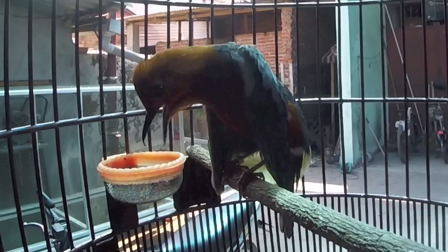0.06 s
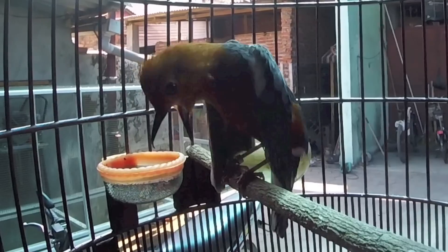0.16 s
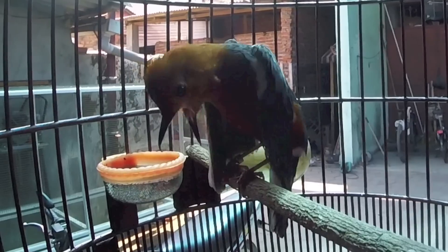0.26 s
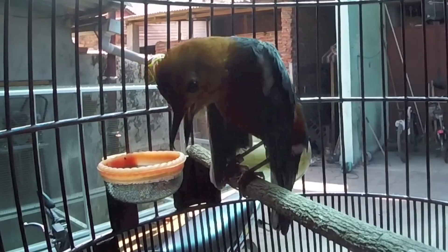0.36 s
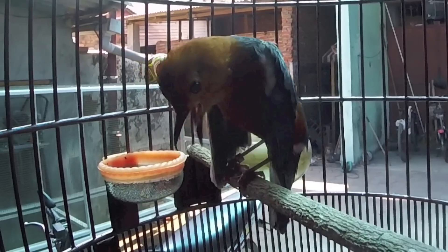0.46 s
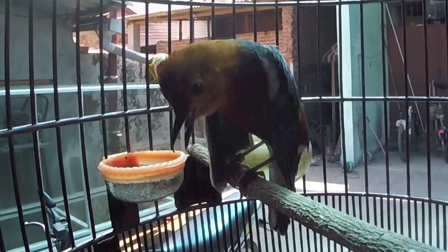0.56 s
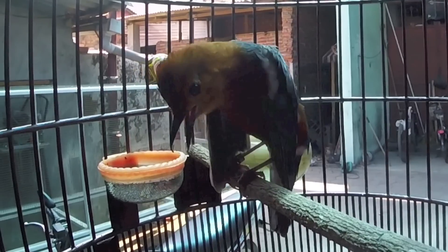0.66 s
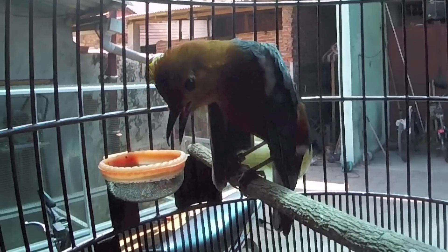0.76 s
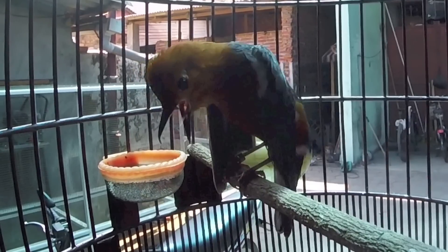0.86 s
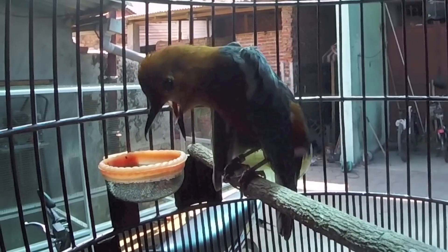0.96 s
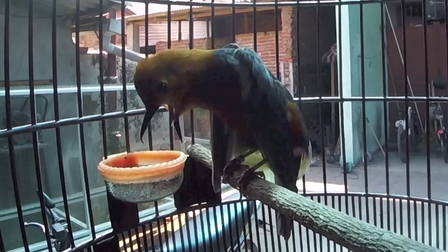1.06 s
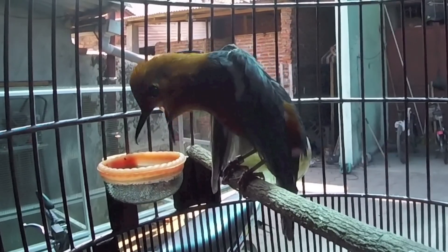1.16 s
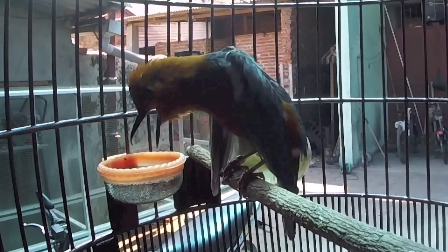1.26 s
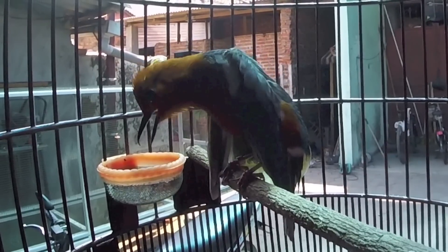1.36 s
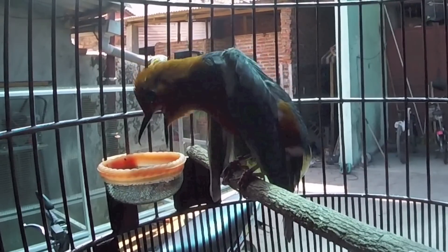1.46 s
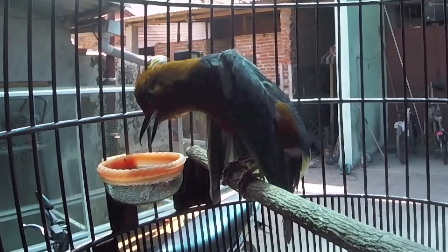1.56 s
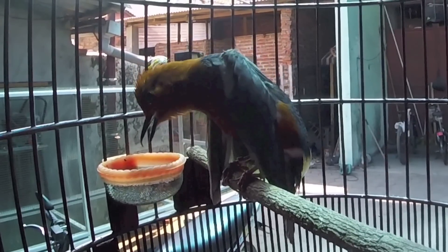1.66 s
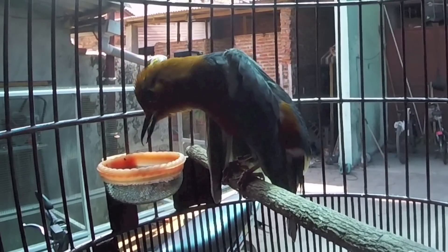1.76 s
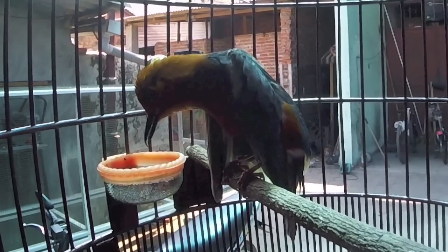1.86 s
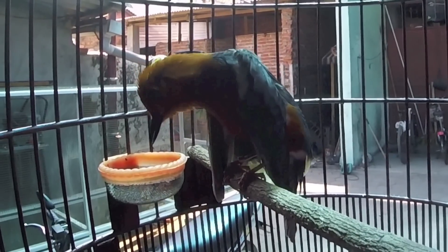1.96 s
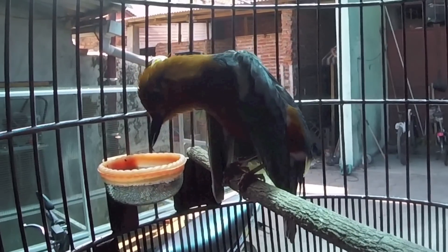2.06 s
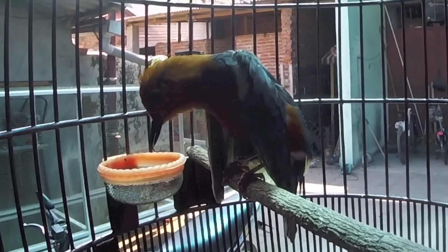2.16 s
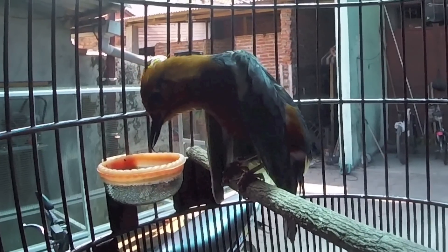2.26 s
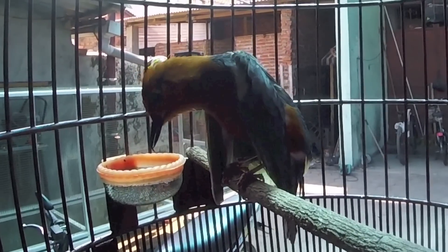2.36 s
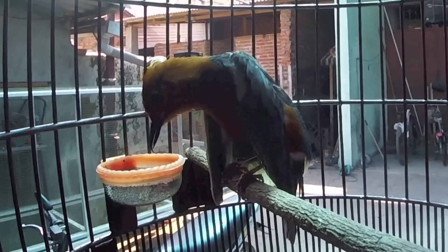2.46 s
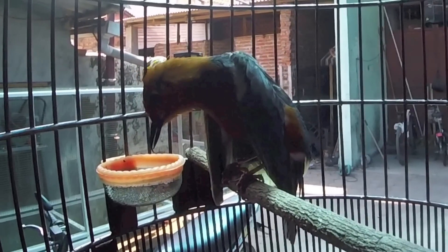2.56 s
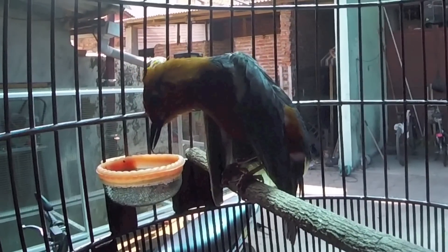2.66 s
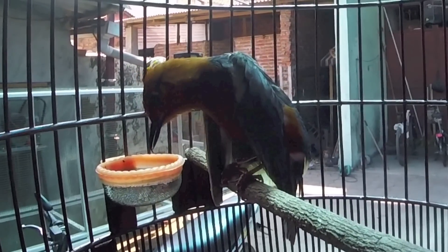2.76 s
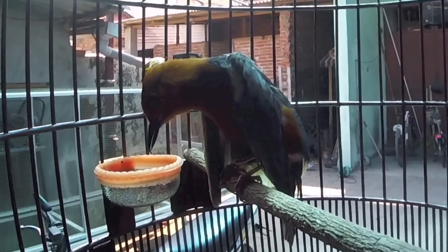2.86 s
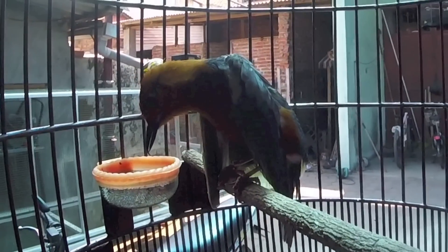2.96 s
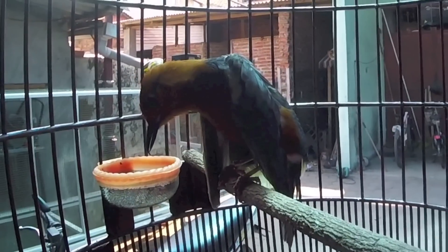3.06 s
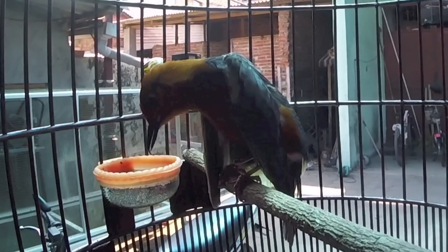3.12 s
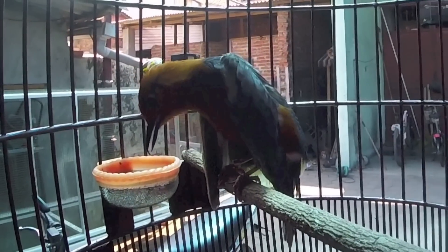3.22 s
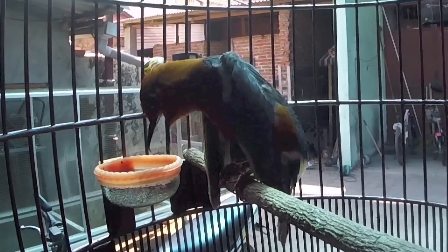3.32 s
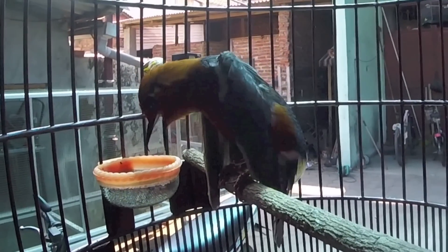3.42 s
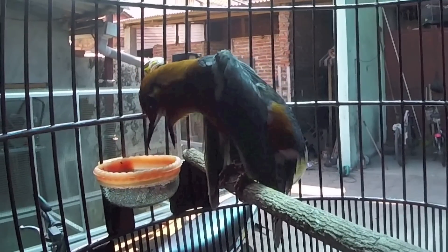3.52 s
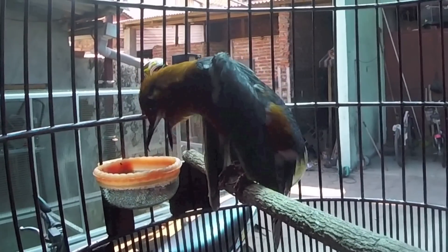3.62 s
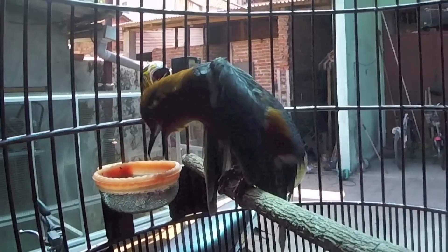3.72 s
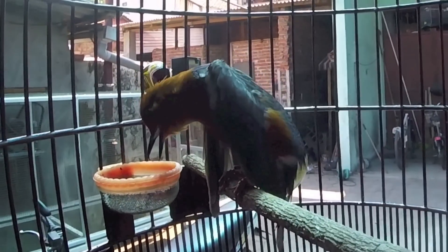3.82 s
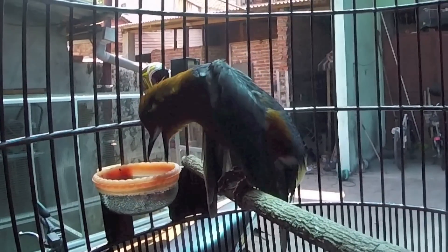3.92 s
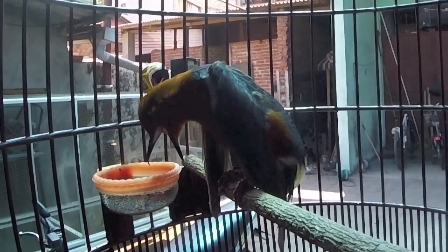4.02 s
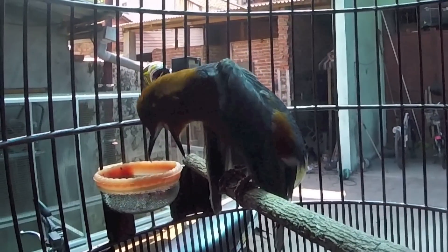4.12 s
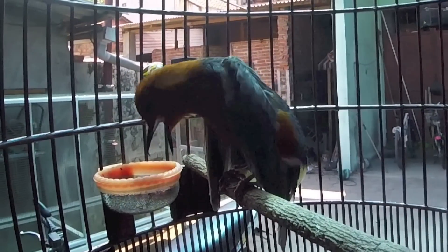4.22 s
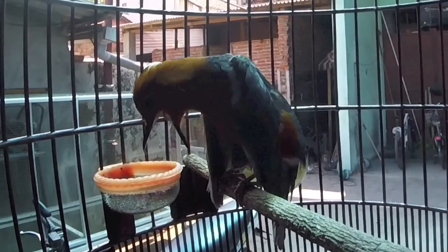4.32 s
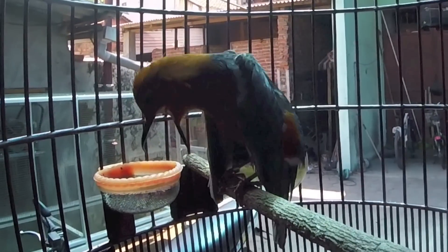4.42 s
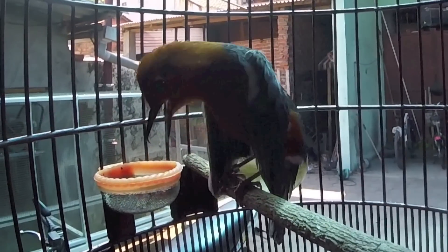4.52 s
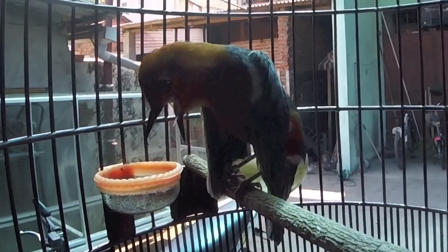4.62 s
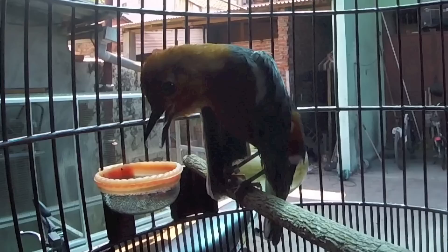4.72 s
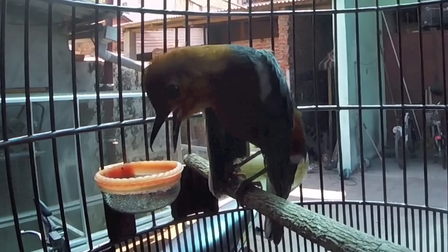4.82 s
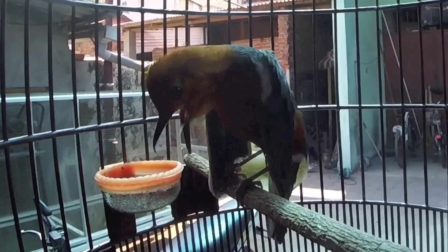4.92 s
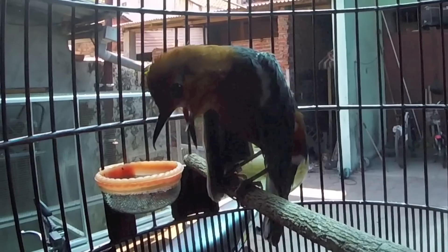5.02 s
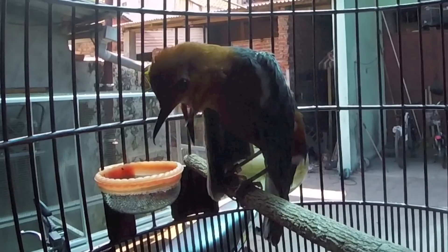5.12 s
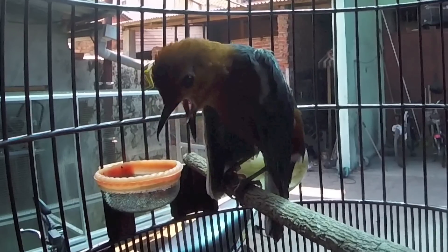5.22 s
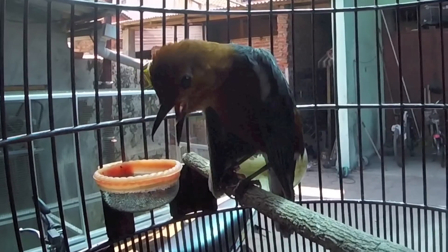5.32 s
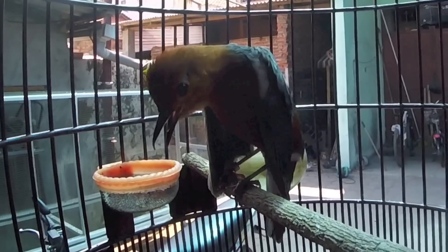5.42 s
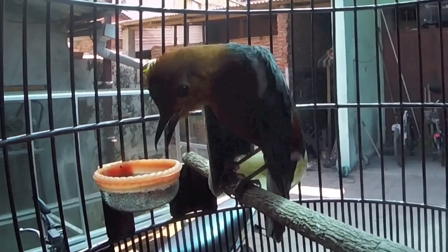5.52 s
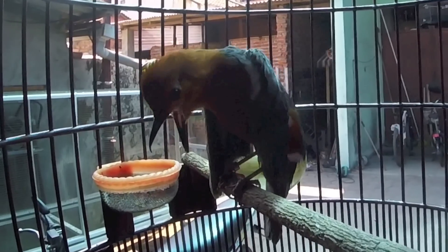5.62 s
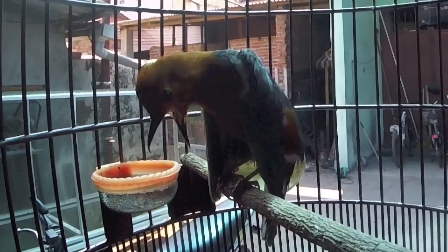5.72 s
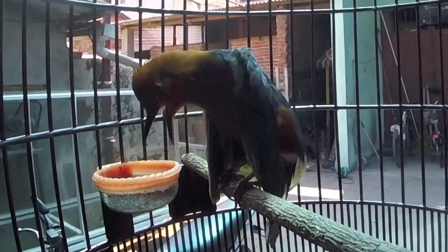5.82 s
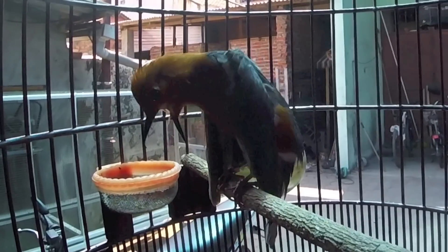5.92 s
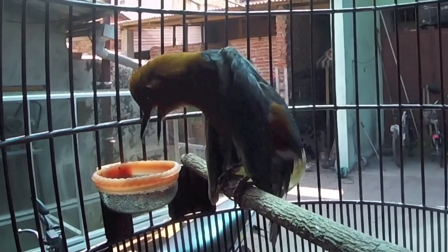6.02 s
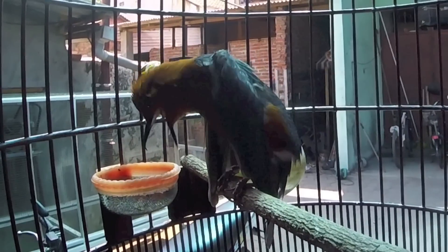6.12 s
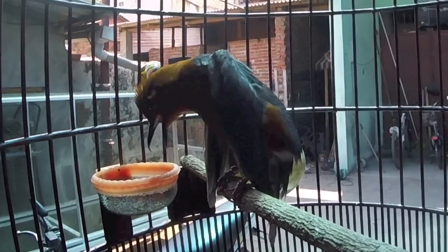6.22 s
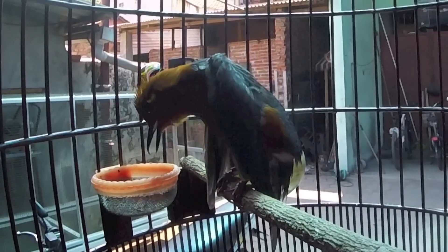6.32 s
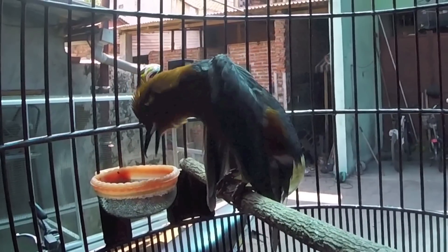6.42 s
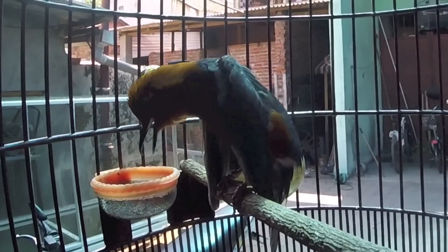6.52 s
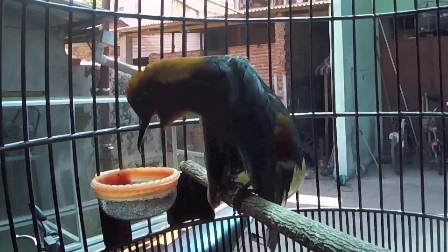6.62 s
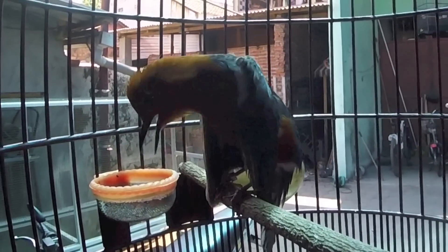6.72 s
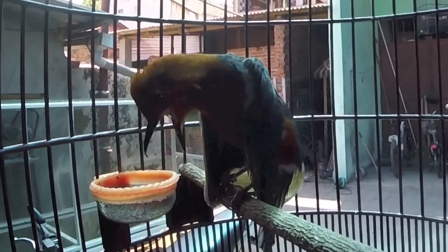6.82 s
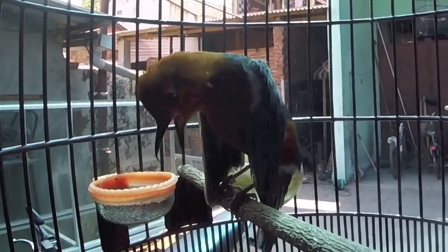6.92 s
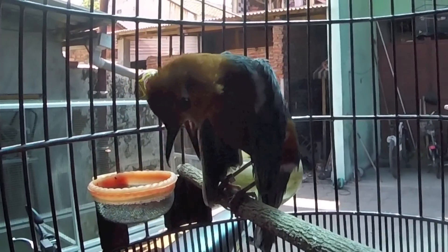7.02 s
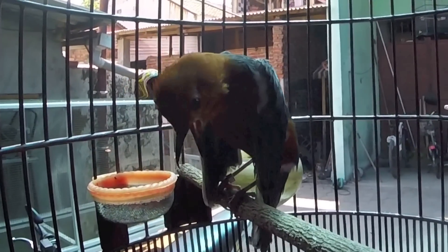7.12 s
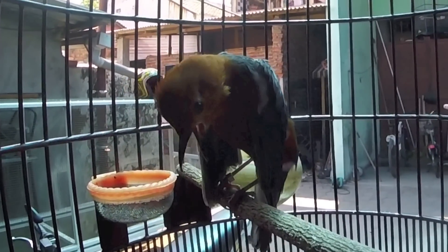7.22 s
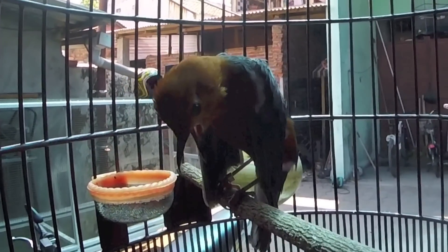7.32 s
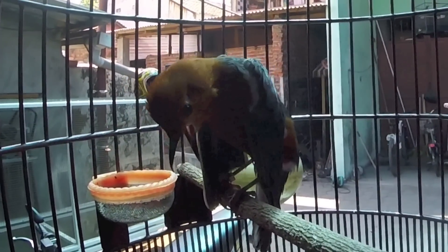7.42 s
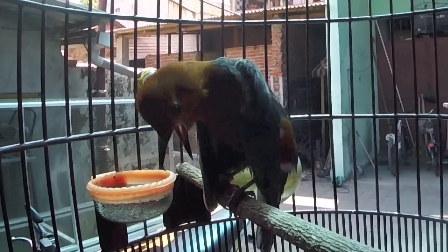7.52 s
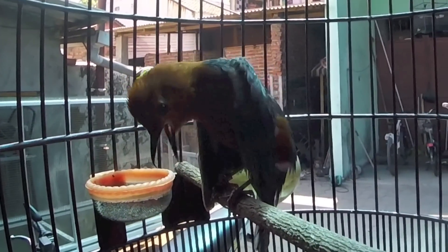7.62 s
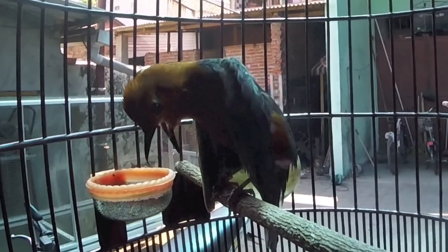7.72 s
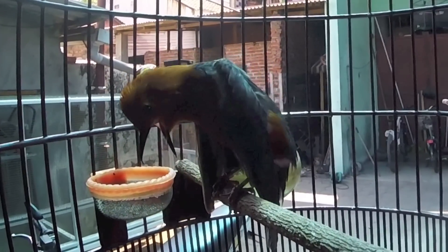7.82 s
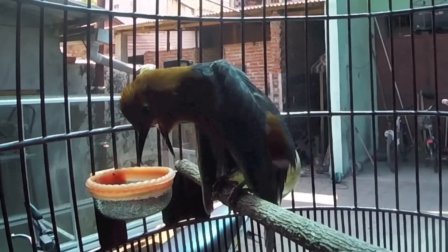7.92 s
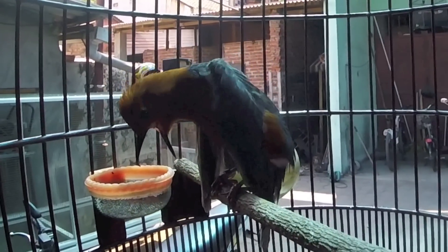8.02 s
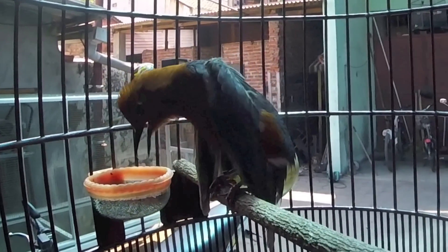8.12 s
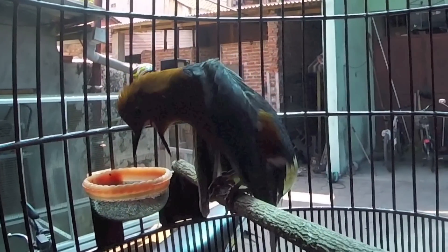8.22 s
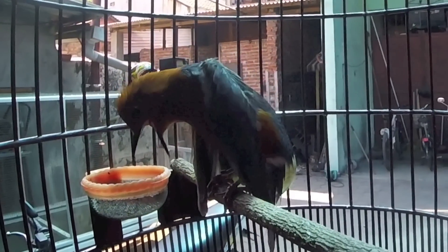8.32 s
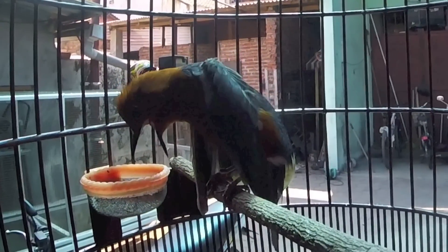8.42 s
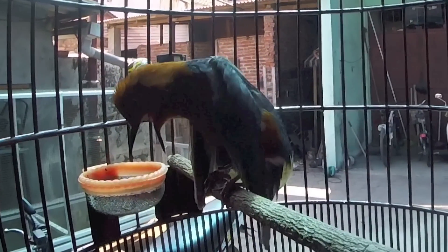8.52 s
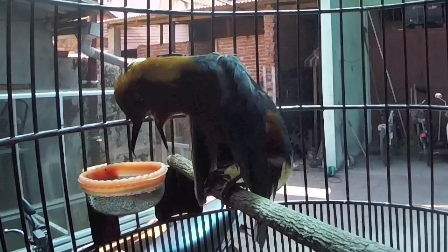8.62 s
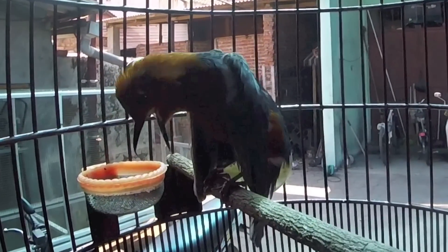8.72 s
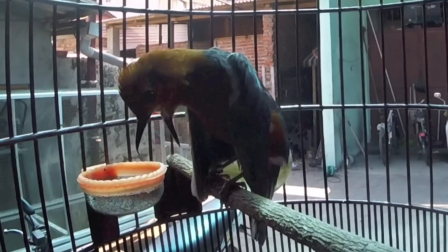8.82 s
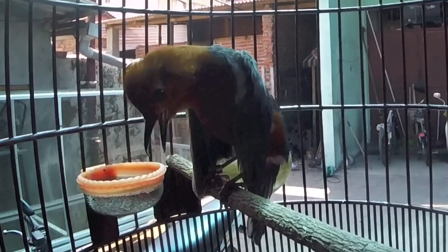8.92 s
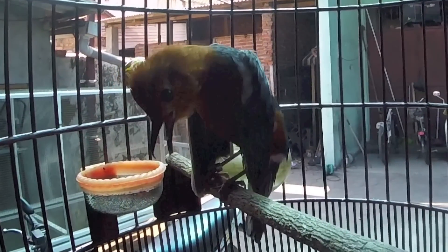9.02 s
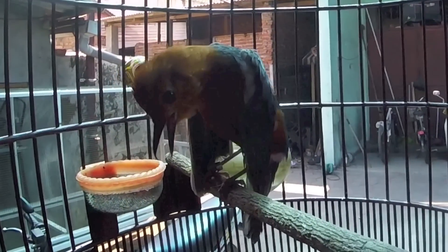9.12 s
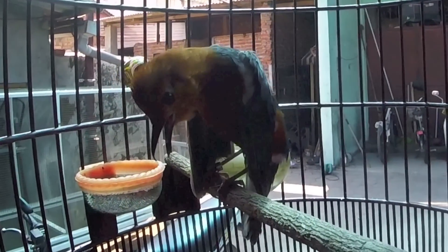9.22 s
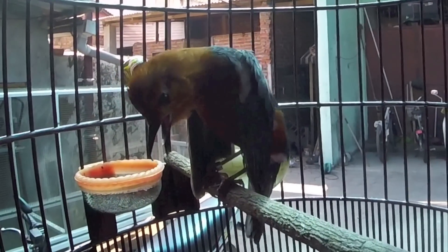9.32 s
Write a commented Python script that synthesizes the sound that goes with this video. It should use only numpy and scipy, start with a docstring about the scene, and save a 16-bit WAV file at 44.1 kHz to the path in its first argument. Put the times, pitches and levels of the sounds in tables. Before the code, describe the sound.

A caged songbird sings loud and close, with a short echo from yard walls. From 0.2 to 1.4 seconds it gives a stepped falling whistle, a longer rising one, tiny dropping notes and a downward slide. It pauses until about 3 seconds, leaving faint distant birds and a soft hiss near 1.8. From 3 to 5.2 seconds come quick varied whistles, high swoops and another rising whistle. Four hoarse arched notes follow from 5.3 to 5.9, then four whip-like falls and a thin high note by 6.6. A loud rapid trill runs from 6.7 to 7.7, with one brief break. Seven quick chips follow from 8 to 8.5, then harsh buzzy notes from 8.8 to 9.3. Other birds call further off in the gaps. Faint traffic rumble and yard noise continue throughout, with passing motors humming a little louder from about 7 seconds.

```python
"""First comes a loud, close whistle: a caged thrush singing in a walled yard. Its voice organ, the
syrinx, makes nearly pure gliding tones; its two sides can sound together and beat. Whistles and
doubled notes lead on to whips, trills, chips and buzzes, all echoing off the walls. Other birds call
from further off, over traffic rumble, passing motors and yard noise; a hiss swells in one pause.
A limiter holds down the loudest notes, which clip a little."""
import sys
import numpy as np
from scipy import signal
from scipy.io import wavfile
from scipy.ndimage import uniform_filter1d, minimum_filter1d

SR = 44100
rng = np.random.default_rng(int(sys.argv[2]) if len(sys.argv) > 2 else 0)


def unload_audio(sound):
    """Save the sound as a 16-bit wav file, at the path given as the first command line argument."""
    columns = np.transpose(np.atleast_2d(sound))
    # keep every value between -1 and 1, then stretch to whole-number steps
    steps = np.round(np.clip(columns, -1, 1) * 32767)
    wavfile.write(sys.argv[1], SR, steps.astype(np.int16))


N = 413216
LEAD = 4000  # samples before time zero, so that early notes already echo

# Levels in the tables are relative: the functions add their own gains.
# tone colour of traffic rumble, yard noise and hiss: f/Hz, level/dB
RUMBLE_COLOUR = [(20, -3.5), (70, 2), (177, -7), (203, -21.5), (520, -60)]
YARD_COLOUR = [(120, -29.5), (200, -3.5), (2170, -15.5), (3760, -6.5), (4820, -19), (5560, -15.5),
               (6520, -28), (7250, -14), (9140, -34.5), (14000, -34.5)]
HISS_COLOUR = [(500, -8.5), (1300, -0.5), (2800, -2.5), (4500, -8.5), (8000, -32)]
# how those three swell and fade: t/s, level/dB
RUMBLE_LEVEL = [(0, -54), (2.601, -43), (5, -54.5), (6.199, -44), (9.37, -40.5)]
YARD_LEVEL = [(0, -54), (1, -62), (1.6, -54.5), (3.2, -53), (3.3, -56.5), (5.701, -57), (5.87, -40),
              (6.202, -50)]
HISS_LEVEL = [(1.3, -61), (1.784, -42), (1.81, -36), (2.05, -46), (2.302, -63)]
# hum of passing motors, one list each: t/s, f/Hz, level/dB
MOTORS = [
    [(2.8, 179.2, -56), (3.2, 179.5, -44.5), (3.6, 183, -76)],
    [(6.4, 87.6, -67), (7.4, 62.9, -35.5), (8.5, 67, -39)],
    [(8.4, 62.35, -44), (8.888, 88.8, -46), (9.37, 85.7, -33)],
]
# low hoarse calls far away: t/s, length/s, f/Hz, level/dB
HOARSE_CALLS = [(0.157, 0.04, 691, -56.5), (1.299, 0.068, 831, -47.5), (1.494, 0.067, 1020, -56),
                (5.84, 0.035, 374, -49)]
# glides of other birds: t/s, length/s, first f/Hz, last f/Hz, level/dB, level change/dB
OTHER_BIRDS = [(1.988, 0.15, 6290, 5560, -63.5, 4), (2.137, 0.057, 5730, 4300, -46, -11.5),
               (2.305, 0.17, 4260, 2400, -45.5, -22), (2.519, 0.56, 8520, 7770, -73, 9.5),
               (2.484, 0.044, 5630, 5270, -55, -1.5), (2.594, 0.038, 3536, 3090, -54.5, -3),
               (2.711, 0.027, 5350, 4020, -41.5, -6), (2.759, 0.17, 6280, 5720, -55, -3),
               (2.785, 0.14, 4550, 4980, -46.5, -16), (6.587, 0.073, 3290, 4506, -45, 20),
               (6.653, 0.1, 2403, 3450, -50.5, 21), (7.384, 0.08, 4440, 2913, -27, -9),
               (7.827, 0.052, 4490, 3146, -23, -9.5), (8.114, 0.058, 3035, 2240, -33.5, -9.5),
               (8.401, 0.084, 3020, 1963, -34.5, -19.5), (8.668, 0.073, 3270, 2003, -33.5, -12.5),
               (9.014, 0.101, 4340, 4650, -50, 0)]
# time for the wall echoes to fade by 60 dB, before stretching: f/Hz, length/s
WALL_DECAY = [(1000, 0.78), (5000, 0.6), (13000, 0.047)]
# tone colour of the wall echoes: f/Hz, level/dB
ECHO_COLOUR = [(1500, 0.5), (4000, -6.5), (6000, -10.5), (7300, -2), (13000, -5)]
# first echoes from the roof and wall close by: delay/s, level/dB
NEAR_ECHOES = [(.0021, -17), (.0047, -20)]

# side tones of the voice, at whole and at half steps of its pitch: multiple, level/dB
WHOLE_TONES = [(2, -25), (3, -43.5), (4, -29.5)]
BETWEEN_TONES = [(.5, -4), (1.5, -3), (2.5, -20)]
# how throat and beak colour the side tones, usually and in trills: f/Hz, level/dB
BEAK_COLOUR = [(2000, -17), (4500, 2.5), (5800, -12), (7300, -6.5), (10500, -4.5), (14000, -5.5)]
TRILL_COLOUR = [(6000, -8), (7300, 10.5), (9500, -20), (10500, -21.5), (12200, -11.5), (14000, -38)]
# loudness of the voice by pitch, usually and in trills: f/Hz, level/dB
VOICE_LOUDNESS = [(2000, -17), (2800, -9), (3700, -0.5), (4450, -7.5), (5200, -2), (6200, -12),
                  (7200, -1.5), (8500, -18.5), (10000, -18.5)]
TRILL_LOUDNESS = [(3100, -13.5), (3600, -8), (4500, -2), (5000, -10.5), (5700, -20)]
# named pitch shapes of whistles, before stretching: t/s within the note, f/Hz
PITCH_SHAPES = { "step": [(0, 4240), (.008, 3910), (.035, 3956), (.084, 3990), (.103, 2980), (.118, 2760),
                (.133, 2875), (.205, 2770), (.222, 2530)], "rise": [(0, 4150), (.012, 3743), (.18, 4148),
                (.33, 4483), (.369, 4380), (.379, 3570), (.39, 2766)], "slide": [(0, 4300), (.018, 4346),
                (.055, 3770), (.125, 2870), (.177, 2460)], "lift": [(0, 2675), (.017, 2760), (.027, 3305),
                (.062, 3290), (.095, 3190)], "peep": [(0, 3550), (.012, 3756), (.064, 3653)],
                "bow": [(0, 3632), (.018, 3888), (.11, 3250), (.178, 2630)], "low": [(0, 1894),
                (.017, 2309), (.059, 2704), (.119, 2548)], "swoop": [(0, 7400), (.016, 7973), (.042, 5630),
                (.057, 5080), (.135, 5470), (.151, 5196), (.163, 3750), (.174, 3737), (.179, 4550),
                (.192, 3720)], "zigzag": [(0, 7500), (.016, 7950), (.033, 5770), (.05, 5030), (.077, 4950),
                (.081, 5400), (.089, 4360), (.098, 4740), (.103, 7700), (.112, 7350), (.118, 5980),
                (.147, 4660), (.16, 3410)], "seep": [(0, 9740), (.021, 8100), (.044, 7060), (.058, 6080)],
                "flick": [(0, 4900), (.007, 7360), (.015, 4700)], "thin": [(0, 8400), (.015, 8750),
                (.06, 7970), (.104, 7650), (.115, 6700)], "hook": [(0, 6840), (.024, 8170), (.04, 7650),
                (.088, 7270)], "pip": [(0, 5420), (.02, 5240)], }
# whistles: t/s, shape name, time stretch, effort/dB, attack/s, effort change/dB
WHISTLES = [(0.203, "step", 1.03, 0, 0.036, -6.5), (1.186, "slide", 0.96, 1.5, 0.052, -21.5),
            (3.172, "lift", 0.8, 3, 0.027, -12.5), (3.259, "peep", 0.94, 1.5, 0.058, -1),
            (3.35, "bow", 0.98, -0.5, 0.031, -13.5), (3.57, "low", 1.02, -7, 0.013, 0.5),
            (3.776, "swoop", 1, -7, 0.018, 3.5), (4.06, "zigzag", 1, -4, 0.026, -1.5),
            (4.381, "step", 0.99, 0.5, 0.037, -7), (6.557, "seep", 0.91, 4, 0.02, -10.5),
            (7.716, "thin", 0.91, 2, 0.03, -10.5), (8.556, "hook", 0.92, -5.5, 0.019, -2),
            (0.561, "rise", 1.006, -0.5, 0.092, -0.5), (4.698, "rise", 0.932, 0.5, 0.088, -1),
            (7.699, "flick", 1.15, -11, .004, 0), (3.054, "pip", 1.4, -33.5, .008, 3),
            (8.564, "pip", 0.68, -11.5, 0.0086, 10.5)]
# falling notes that close each rising whistle: t/s, top f/Hz, effort/dB
DROP_NOTES = [(0.952, 4060, -6.5), (0.982, 3745, -5.5), (1.008, 3420, -17.5), (5.063, 3890, -6),
              (5.092, 3675, -7.5), (5.122, 3506, -6.5)]
# arched notes: t/s, length/s, share of length before the crest, first f/Hz, crest f/Hz, last f/Hz,
# level/dB, boost of the in-between tones/dB, roughness
DOUBLED_NOTES = [(-0.06, 0.088, 0.8, 4250, 5216, 3360, -15, 9.5, 1.1),
                 (3.072, 0.095, 0.2, 3670, 4720, 4850, -14.5, 10, 1.5),
                 (5.333, 0.081, 0.61, 4590, 5860, 4110, -15, 0, .8),
                 (5.454, 0.092, 0.73, 4250, 5240, 3260, -14, 2, 1.1),
                 (5.623, .11, .63, 4210, 5020, 3166, -13, -1, 1.05),
                 (5.818, 0.12, 0.64, 4210, 4850, 3170, -9.5, -5.5, 0.46)]
# fast falls: t/s, length/s, top f/Hz, share of length at mid fall, steepness, effort/dB, attack/s
WHIP_NOTES = [(6.051, 0.064, 7430, .55, 1.7, -8.5, 0.016), (6.172, 0.058, 8200, .38, 2.3, -8, 0.022),
              (6.287, 0.058, 8800, .2, 3.6, -8.5, 0.014), (6.404, 0.063, 8300, .17, 3.6, -8.5, 0.013)]
# outline of each trill: t/s, top f/Hz, bottom f/Hz, level/dB
TRILL_OUTLINES = [
    [(6.712, 3170, 3150, -10), (6.738, 4660, 3300, -6), (6.75, 4690, 3664, -4), (6.82, 5110, 3080, -3.5),
     (6.94, 4650, 3060, -2), (6.97, 5790, 3275, -6.5), (6.992, 5910, 3220, -2), (7.01, 4850, 3333, -3.5),
     (7.15, 4850, 3430, -4.5), (7.195, 4270, 3460, -4.5), (7.33, 4510, 3210, -2.5), (7.376, 5330, 3110, -4)],
    [(7.499, 4960, 3536, -9.5), (7.698, 5165, 3316, -4)],
]
# pace of both trills: t/s, strokes sung so far
TRILL_PACE = [(6.74, -.44), (6.75, 0), (6.857, 6), (6.99, 13), (7.164, 21), (7.224, 23), (7.363, 29),
              (7.512, 36), (7.7, 44.75)]
# shape of one chip: t/s within the note, f/Hz, level/dB
CHIP_SHAPE = [(0, 3530, -19), (.004, 3820, -6.5), (.009, 4590, -6.5), (.014, 4856, 1), (.019, 5120, -1.5),
              (.026, 4775, -2), (.032, 3850, -48)]
# the run of chips: t/s, level/dB
CHIP_NOTES = [(7.951, -9.5), (8.026, -11), (8.106, -9), (8.189, -11.5), (8.273, -9.5), (8.357, -11),
              (8.443, -10.5)]
# harsh chopped notes: start t/s, loudest t/s, end t/s, level/dB, f/Hz
BUZZ_NOTES = [(8.755, 8.773, 8.797, -10, 3270), (8.813, 8.851, 8.882, -11.5, 3155),
              (8.906, 8.927, 8.955, -10, 3340), (8.988, 8.998, 9.04, -8, 3336),
              (9.128, 9.137, 9.172, -11, 2980), (9.16, 9.223, 9.26, -13, 2996),
              (9.28, 9.303, 9.328, -8, 3330)]


def gain_of(db):
    return 10 ** (np.asarray(db) / 20)


def unit_rms(x):
    return x / np.sqrt(np.mean(x ** 2) + 1e-20)


def look_up(table, hz):
    """The table's value at a pitch, blended between its rows."""
    f, value = np.transpose(table)
    return np.interp(np.log(hz + 1), np.log(f + 1), value)


def add(mix, start, sound):
    part = mix[round(start * SR) + LEAD:][:len(sound)]
    part += sound[:len(part)]


def curves(rows, smooth_s=.003):
    """Turn timed rows into one smooth curve for each column after the time."""
    times, *columns = np.transpose(rows)
    t = np.arange(times[0], times[-1], 1 / SR)
    size = round(smooth_s * SR) + 1
    return [uniform_filter1d(np.interp(t, times, c), size, mode="nearest") for c in columns]


def wander(n, hz):
    """A smooth random wobble of typical size 1; hz sets how fast it moves."""
    size = round(SR / hz)
    return unit_rms(uniform_filter1d(uniform_filter1d(rng.standard_normal(n), size), size))


def noise_bed(colour, levels, low_hz, high_hz, patchy_db):
    """Noise with drifting louder patches; levels sets its strength between low_hz and high_hz."""
    frames, hz = N // 512 + 5, np.fft.rfftfreq(2048, 1 / SR)
    real, imag, patches = rng.standard_normal((frames, 1025, 3)).T
    patches = unit_rms(uniform_filter1d(uniform_filter1d(patches, 16, axis=0), 8, axis=1))
    shape = gain_of(look_up(colour, hz))
    band_share = np.sqrt(np.sum(shape[(hz > low_hz) & (hz < high_hz)] ** 2) / np.sum(shape ** 2))
    spectra = (real + 1j * imag) * shape[:, None] * gain_of(patchy_db * patches)
    noise = signal.istft(spectra, nperseg=2048, noverlap=1536)[1][:N]
    return unit_rms(noise) / band_share * gain_of(np.interp(np.arange(N) / SR, *np.transpose(levels)))


def motors():
    """Each motor passing in the street hums one low, wavering tone."""
    out = np.zeros(N + LEAD)
    for rows in MOTORS:
        hz, db = curves(rows)
        tone = np.sin(2 * np.pi * np.cumsum(hz * (1 + .0094 * wander(len(hz), 21))) / SR)
        add(out, rows[0][0], np.sqrt(2) * gain_of(db) * tone * signal.windows.tukey(len(hz), .2))
    return out


def wall_echoes(sound, stretch):
    """Many small echoes bounce round the yard; the high pitches die first."""
    echoes = np.zeros(SR)
    slots = np.arange(130, SR - 20, 20)
    echoes[slots + rng.integers(0, 20, len(slots))] = rng.choice([-1., 1.], len(slots))
    hz, t, spectra = signal.stft(echoes, SR, nperseg=256)
    decay_s = stretch * look_up(WALL_DECAY, hz)[:, None]
    fade_db = look_up(ECHO_COLOUR, hz)[:, None] - 60 * t / decay_s
    tail = signal.istft(spectra * gain_of(fade_db), SR, nperseg=256)[1]
    return signal.fftconvolve(sound, tail / np.linalg.norm(tail))[:len(sound)]


def hoarse_calls():
    """Far calls: a rough tone and its octave swell and fade."""
    out = np.zeros(N + LEAD)
    for start, length, hz, db in HOARSE_CALLS:
        n = round(length * SR)
        phase = 2 * np.pi * np.cumsum(hz * (1 + .085 * wander(n, 350))) / SR
        tone = np.sin(phase) + .29 * np.sin(2 * phase)
        add(out, start, gain_of(db) * tone * signal.windows.tukey(n, .4))
    return out


def breath(n, attack_s, release_s):
    """Loudness of one note in dB: it swells, holds and is cut off."""
    t = (np.arange(n) + 1) / SR
    return 20 * np.log10(np.minimum(t / attack_s, 1) ** .69 * np.minimum(t[::-1] / release_s, 1))


def syrinx(hz, db, side_tones, waver, rasp, flutter_db=.4, blur=0., beak=BEAK_COLOUR):
    """A bird's tone: waver shakes the pitch, rasp and flutter the level; blur makes side tones hiss."""
    n = len(hz)
    hz = hz * (1 + waver * wander(n, 350))
    phase = 2 * np.pi * np.cumsum(hz) / SR
    sides = sum(gain_of(side_db + look_up(beak, k * hz)) * (k * hz < SR / 2.2) * np.sin(k * phase)
                * (1 + blur * k * wander(n, 2200)) for k, side_db in side_tones)
    soft_ends = signal.windows.tukey(n, min(.006 * SR / n, 1))
    shake = 1 + rasp * wander(n, 1500)
    loudness = np.sqrt(2) * gain_of(db + flutter_db * wander(n, 100))
    return loudness * (np.sin(phase) + sides) * shake * soft_ends


def other_birds():
    """Birds further off each whistle one rough glide."""
    out = np.zeros(N + LEAD)
    for start, length, first_hz, last_hz, level_db, change_db in OTHER_BIRDS:
        progress = np.arange(0, 1, 1 / (length * SR))
        hz = first_hz * (last_hz / first_hz) ** progress
        db = level_db + change_db * progress + breath(len(hz), .0061, .0044)
        add(out, start, syrinx(hz, db, [], waver=.0068, rasp=.39, flutter_db=3.5))
    return out


def whistle(hz, effort_db, attack_s, change_db, release_s=.012, waver=.003, rasp=.004):
    """Loudness follows effort and pitch; quick slides roughen the voice and thin its overtones."""
    db = effort_db + np.linspace(0, change_db, len(hz)) + look_up(VOICE_LOUDNESS, hz)
    db += breath(len(hz), attack_s, release_s)
    slide_speed = uniform_filter1d(abs(np.gradient(np.log(hz))) * SR, size=400)
    sides = [(k, side_db - .1 * slide_speed) for k, side_db in WHOLE_TONES]
    return syrinx(hz, db, sides, waver=waver * (1 + .42 * slide_speed),
                  rasp=rasp + np.minimum(.002 * slide_speed, .3), flutter_db=.6)


def drop(top_hz, effort_db, length_s=.031):
    """A short hoarse note that tips over and falls."""
    progress = np.arange(0, 1, 1 / (length_s * SR))
    hz = top_hz * (1 - .32 * progress ** 1.9)
    return whistle(hz, effort_db, attack_s=.0056, change_db=-1.6, release_s=.0055, waver=.0052, rasp=.05)


def doubled(length, crest, first_hz, crest_hz, last_hz, level_db, boost_db, rasp):
    """The pitch climbs and bends over; the voice grows and roughens as its two sides drift apart."""
    progress = np.arange(0, 1, 1 / (length * SR))
    before = np.maximum(1 - progress / crest, 0)  # 1 at the start, 0 at the crest
    after = np.maximum(progress - crest, 0) / (1 - crest)  # 0 at the crest, 1 at the end
    fall_hz = crest_hz - last_hz
    hz = crest_hz - (crest_hz - first_hz) * before ** 1.8 - fall_hz * after ** 2.1
    db = level_db - 4.5 * (1 - progress) + breath(len(hz), .013, .008)
    sides = [(k, side_db - 9 * before) for k, side_db in WHOLE_TONES]
    sides += [(k, side_db + boost_db - 12 * after - 9 * k * before) for k, side_db in BETWEEN_TONES]
    weak = syrinx(hz - fall_hz * after * (1 - after), db - 7, [], waver=.006, rasp=.2)
    strong = syrinx(hz, db, sides, waver=.004, rasp=rasp * (.09 + .4 * after ** 3),
                    flutter_db=1.2, blur=.14 + .22 * after)
    return strong + np.minimum(3 * after, 1) * weak


def whip(length, top_hz, middle, steepness, effort_db, attack_s, floor_hz=2350, shelf_hz=3250):
    """The pitch lingers, then plunges; the second side trails and levels out higher, so the two beat."""
    progress = np.arange(0, 1, 1 / (length * SR))
    height = 1 / (1 + (progress / middle) ** steepness)
    low_hz = floor_hz * (top_hz / floor_hz) ** ((height - height[-1]) / (1 - height[-1]))
    low_hz *= 1 - .17 * progress ** 5  # a last sag
    high_hz = (low_hz ** 6 + shelf_hz ** 6.) ** (1 / 6)
    swell_db = effort_db + breath(len(progress), attack_s, .005)
    early_fade_db = np.clip(70 * (.44 - height), 0, 10) + 300 * np.maximum(progress - .68, 0)
    first, second = (syrinx(hz, swell_db + look_up(VOICE_LOUDNESS, hz) - fade_db, [(2, -30)],
                            waver=.011, rasp=.3, flutter_db=2.5, blur=.4)
                     for hz, fade_db in ((low_hz, 2 * (1 - height)), (high_hz, early_fade_db)))
    lag = round(.003 * SR)
    return np.pad(first, (0, lag)) + np.pad(second, (lag, 0))


def trill(rows, contrast, climb_share=.44):
    """The pitch flicks up to a point and sags back; the voice thins at the bottom and the very top."""
    top_hz, bottom_hz, db = curves(rows)
    stroke = np.interp(rows[0][0] + np.arange(len(db)) / SR, *np.transpose(TRILL_PACE)) % 1
    height = np.interp(stroke, [0, 1 - climb_share, 1], [1, 0, 1])
    height = uniform_filter1d(height ** 1.35, size=round(.0042 * SR))
    hz = bottom_hz + (top_hz * (1 + .028 * wander(len(db), 70)) - bottom_hz) * height
    return syrinx(hz, db + contrast * look_up(TRILL_LOUDNESS, hz), [(2, -25), (3, -24)],
                  waver=.012, rasp=.1, flutter_db=2, blur=.22, beak=TRILL_COLOUR)


def chip(level_db):
    """A tiny arched note; no two reach quite the same pitch."""
    hz, db = curves(CHIP_SHAPE, smooth_s=.00074)
    hz *= 1 + .025 * rng.uniform(-1, 1)
    sides = WHOLE_TONES + [(.5, -17), (1.5, 1), (2.5, -31)]
    return syrinx(hz, db + level_db, sides, waver=.007, rasp=.08, flutter_db=1.5, blur=.15)


def buzz(start, loudest, end, level_db, pitch_hz, strokes_per_s=160):
    """A sinking note chopped into fast, uneven strokes that each fall in pitch."""
    hz, db = curves([(start, 1.03 * pitch_hz, level_db - 12), (loudest, pitch_hz, level_db),
                     (end, .84 * pitch_hz, level_db - 13)])
    stroke = np.cumsum(strokes_per_s * (1 + .325 * wander(len(hz), 54.4))) / SR % 1
    hz *= 1 + .22 * uniform_filter1d(.5 - stroke, size=90)
    db -= 24 * abs(2 * stroke - 1) ** 5  # gaps between strokes
    return syrinx(hz, db, [(2, -25), (3, -44), (4, -37)], waver=.022, rasp=.25, flutter_db=2.2, blur=.25)


def thrush():
    """The near bird sings each of its notes at its own time."""
    out = np.zeros(N + LEAD)
    for start, name, stretch, *voice in WHISTLES:
        hz, = curves(np.multiply(PITCH_SHAPES[name], (stretch, 1)), smooth_s=.004)
        add(out, start, whistle(hz, *voice))
    for sing, notes in ((chip, CHIP_NOTES), (drop, DROP_NOTES), (doubled, DOUBLED_NOTES),
                        (whip, WHIP_NOTES)):
        for start, *shape in notes:
            add(out, start, sing(*shape))
    for rows, contrast in zip(TRILL_OUTLINES, (1.15, .65)):
        add(out, rows[0][0], trill(rows, contrast))
    for row in BUZZ_NOTES:
        add(out, row[0], buzz(*row))
    return out


def scene():
    """The thrush and its echoes, over far voices heard mostly as echoes and the background noise."""
    near, far = thrush(), other_birds() + hoarse_calls()
    first_echoes = sum(gain_of(db) * np.roll(near, round(delay * SR)) for delay, db in NEAR_ECHOES)
    distant = gain_of(10.5) * (.5 * far + wall_echoes(far, stretch=.9))
    song = near + first_echoes + gain_of(-15.5) * wall_echoes(near, stretch=.95)
    tones = (song + distant + motors())[LEAD:]
    yard = noise_bed(YARD_COLOUR, YARD_LEVEL, 300, 1600, patchy_db=1.5)
    rumble = noise_bed(RUMBLE_COLOUR, RUMBLE_LEVEL, 20, 200, patchy_db=1.2)
    hiss = noise_bed(HISS_COLOUR, HISS_LEVEL, 1000, 3800, patchy_db=2.5)
    return (tones + yard + rumble + hiss)[None]


def record(dry, ceiling=1.07, cutoff_hz=14200):
    """A fast limiter holds peaks just over full scale, where they clip; the top treble is then cut."""
    peak = -minimum_filter1d(-abs(dry), size=200) / ceiling
    limited = np.clip(dry / np.maximum(uniform_filter1d(peak, size=100), 1), -1, 1)
    low_pass = signal.firwin(511, cutoff_hz, window=("kaiser", 9), fs=SR)
    return np.clip(signal.oaconvolve(limited, low_pass[None], "same"), -1, 1)


dry = scene()
out = record(dry)
unload_audio(out)
```